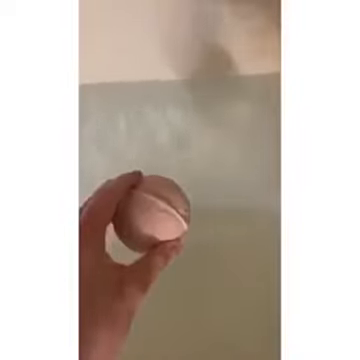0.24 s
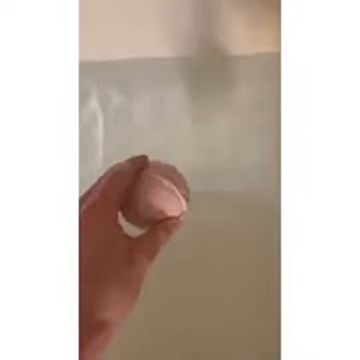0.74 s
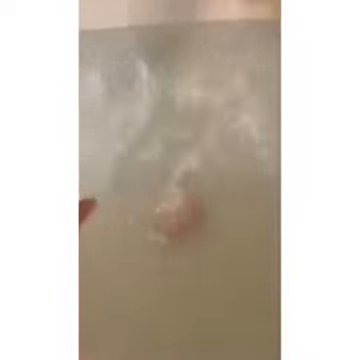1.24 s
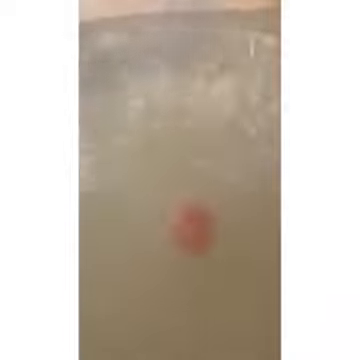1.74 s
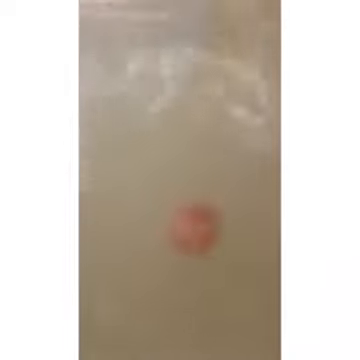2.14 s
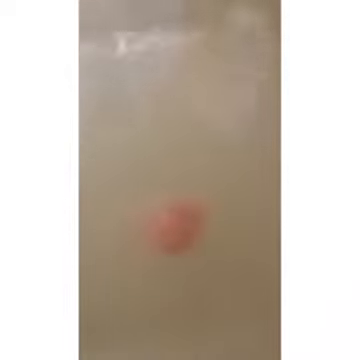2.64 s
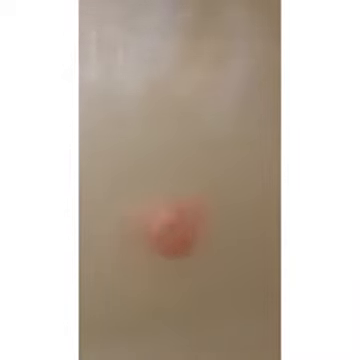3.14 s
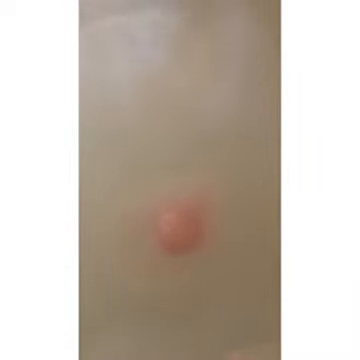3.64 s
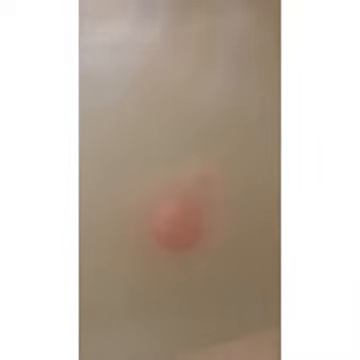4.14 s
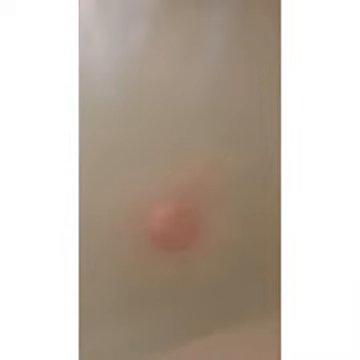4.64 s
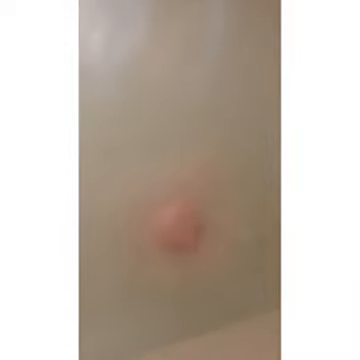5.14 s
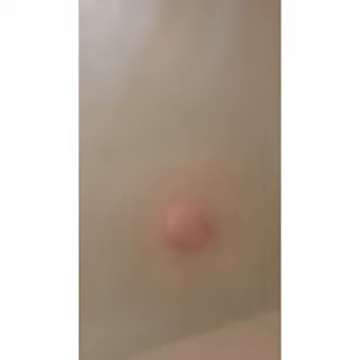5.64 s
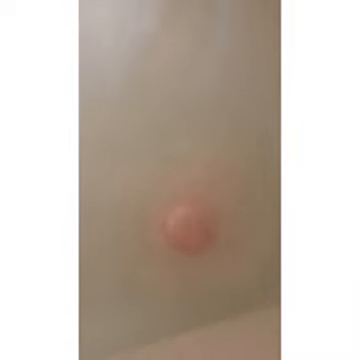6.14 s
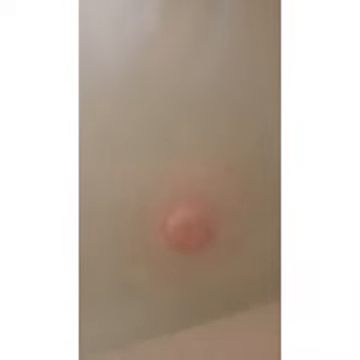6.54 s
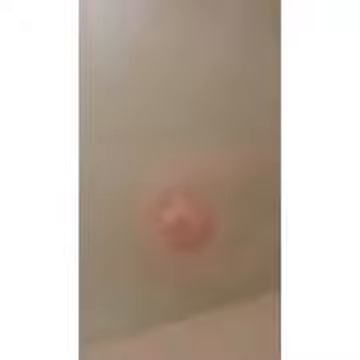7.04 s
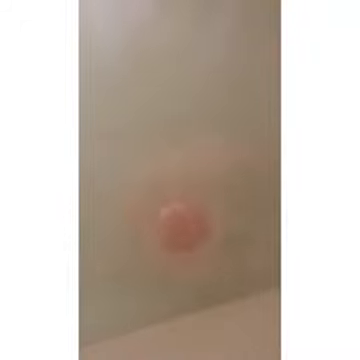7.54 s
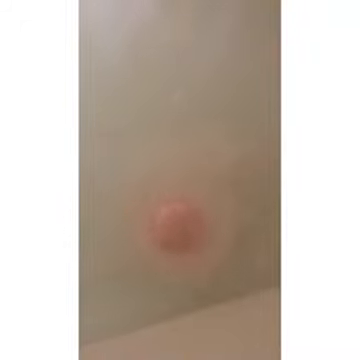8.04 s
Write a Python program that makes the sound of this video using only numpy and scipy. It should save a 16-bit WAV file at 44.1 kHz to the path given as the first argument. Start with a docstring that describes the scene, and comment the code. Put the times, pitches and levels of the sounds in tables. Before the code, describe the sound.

Close handheld stereo sound of a running whirlpool bath. A low, even motor drone lies under continuous foamy churning. A cluster of dull thumps on the tub comes first, followed by a short, bright plop as a ball drops in. Afterwards the water keeps fizzing and gurgling, slightly less bright, with small bubble bursts, occasional soft knocks and sharp droplet cracks near the end.

```python
"""Whirlpool jets churn a full bathtub: filtered noise and bubble swarms rumble, hiss and fizz.
Bubbles pop as short rings with spits of noise; knocks ring the modes of the tub shell.
A small ball drops in as damped sines, droplets crack on the tub wall, and the pump hums in sines.
A small tiled bathroom answers with decaying noise, heard close up by a handheld two-port microphone."""
import sys
import numpy as np
from scipy import signal
from scipy.fft import rfft, irfft, next_fast_len
from scipy.io import wavfile
from scipy.ndimage import uniform_filter1d, map_coordinates

SR = 44100
rng = np.random.default_rng(int(sys.argv[2]) if len(sys.argv) > 2 else 0)


def file_out(sig):
    """Save sig as 16-bit WAV at sys.argv[1]."""
    # one column per channel
    cols = np.atleast_2d(sig).T
    # limit, then scale
    lim = np.clip(cols, -1, 1)
    pcm = np.round(lim * 32767).astype(np.int16)
    wavfile.write(sys.argv[1], SR, pcm)


N = 365148
TOP_HZ = 15750  # band limit of the whole sound


def amp(db):
    """Gain of a level in dB."""
    return 10 ** (np.asarray(db) / 20)


def unit(x):
    """x at rms 1."""
    return x / np.sqrt(np.mean(x ** 2) + 1e-20)


def along(points, hz):
    """Read (frequency, value) points at hz, on a log frequency axis."""
    f, v = np.transpose(points)
    return np.interp(np.log(hz + 1), np.log(f + 1), v)


def curves(rows):
    """One value per sample for each column after the time."""
    s, *cols = np.transpose(rows)
    return [np.interp(np.arange(N) / SR, s, c) for c in cols]


def wobble(rate):
    """A smooth random curve, rate knots a second."""
    knots = rng.standard_normal(int(N * rate / SR) + 4)
    return map_coordinates(knots, [np.arange(N) * rate / SR])


def filtered(x, response):
    """x times a complex response of frequency."""
    m = next_fast_len(N + SR // 2)
    return irfft(rfft(x, m) * response(np.fft.rfftfreq(m, 1 / SR)), m)[..., :N]


def shaped(x, colour):
    """x through a colour filter, then set to rms 1."""
    return unit(filtered(x, colour))


def ringing(modes, hz):
    """Summed response of resonances, each with a centre, a width and a peak level."""
    return sum(amp(db) * 1j * hz * w / (c * c - hz * hz + 1j * hz * w) for c, w, db in modes)


def add_at(out, s, grain):
    """Mix a grain into out from time s."""
    out[round(s * SR):][:len(grain)] += grain


# decay of the tiled walls: (frequency [Hz], t60 [s])
TILE_DECAY = [(200, 0.56), (2000, 0.19), (12000, 0.097)]


def tiles(x):
    """Walls answer as decaying noise, duller bands lasting longer, at the level of the sound itself."""
    hz, t, z = signal.stft(rng.standard_normal(SR // 2), SR, nperseg=256)
    z = z * amp(-60 * t / along(TILE_DECAY, hz)[:, None])
    # every band of the tail gets the same energy
    tail = signal.istft(z / np.linalg.norm(z, axis=1, keepdims=True), SR, nperseg=256)[1]
    return signal.fftconvolve(x, tail / np.linalg.norm(tail))[:N]


def scattered(x):
    """Off the heaving water, the phases of the echoes never stay put."""
    z = signal.stft(x, nperseg=2048)[2]
    z = z * np.exp(2j * np.pi * rng.random(z.shape))
    # random phases cancel about half the power where frames overlap
    return np.sqrt(2) * signal.istft(z, nperseg=2048)[1][:N]


# colour of the water while the microphone is held high: (frequency [Hz], level [dB])
HIGH_COLOUR = [(1000, -1), (1500, -3), (1950, 4), (2170, -2), (2500, 4), (2800, -7.5), (3030, -4.5),
               (3320, 2), (3700, -0.5), (4100, -3), (4600, -2)]
# start and end of the move down: (time [s], time [s])
LOWERING = [2.03, 2.63]


def handheld(x):
    """The hand lowers the microphone: the coloured water crossfades to the plain water."""
    high = np.interp(np.arange(N) / SR, LOWERING, [1, 0])
    coloured = filtered(x, lambda hz: amp(along(HIGH_COLOUR, hz)))
    return (1 - high) * x + high * coloured


# likeness of the two ports: (frequency [Hz], left-right correlation [-1 to 1])
PORT_LIKENESS = [(90, 1), (300, .91), (480, .52), (850, .3), (1300, .72), (2000, .55), (3000, .75),
                 (3900, .7), (4500, .998), (15000, .998)]
# phase by which the left port leads: (frequency [Hz], phase [rad])
LEFT_LEAD = [(0, 0), (1450, .05), (2400, 2.2), (3300, 1.45), (4000, 2.2), (4700, 3.14), (6850, 6.28),
             (8950, 9.42), (15150, 18.85), (16000, 20.1)]
# left port over right port: (frequency [Hz], level [dB])
LEFT_OVER_RIGHT = [(90, 0), (300, 3.2), (600, .4), (900, -.3), (1400, 1.2), (2000, 0), (2900, .8),
                   (4000, .3), (6000, 0)]


def ports(near, diffuse):
    """Both ports share the near sound; the diffuse sound, phase and level set them apart."""
    def turn(hz):
        return np.arccos(np.clip(along(PORT_LIKENESS, hz), -1, 1)) / 2

    mid = filtered(near, lambda hz: np.cos(turn(hz)))
    side = filtered(diffuse, lambda hz: np.sin(turn(hz)))
    half = np.array([[.5], [-.5]])  # each port takes half of the difference

    def offset(hz):
        lead = np.interp(hz, *np.transpose(LEFT_LEAD))
        return amp(half * along(LEFT_OVER_RIGHT, hz)) * np.exp(1j * half * lead)

    return filtered(np.array([mid + side, mid - side]), offset)


# pump shaft: (time [s], frequency [Hz], rms level [dB])
PUMP_SHAFT = [(0, 45.05, -33.6), (4.5, 45.06, -33.6), (8.28, 45.18, -33.6)]
# shaft orders before their waver: (multiple of the shaft, level re the shaft tone [dB])
SHAFT_ORDERS = [(2, -12.5), (4, -17.5), (6, -10), (7, -14)]
# motor buzz before its waver: (frequency [Hz], rms level [dB])
MOTOR_BUZZ = [(120, -46)]


def pump():
    """The shaft tone is clean; its orders and the motor buzz waver in level and phase."""
    hz, db = curves(PUMP_SHAFT)
    turn, t = 2 * np.pi * np.cumsum(hz) / SR, np.arange(N) / SR

    def waver(level_db, phase):
        return amp(level_db + 2 * wobble(7)) * np.sin(phase + .8 * wobble(5))

    shaft = np.sin(turn) + sum(waver(level, k * turn) for k, level in SHAFT_ORDERS)
    buzz = sum(waver(level, 2 * np.pi * f * t) for f, level in MOTOR_BUZZ)
    return np.sqrt(2) * (amp(db) * shaft + buzz)


TICK_T60_S = 0.013
# droplets strike the tub wall: (time [s], peak level [dB], frequency [Hz])
DROPLET_TICKS = [(0.5457, -13, 9000), (0.6529, -13, 9000), (1.4137, -15, 7000), (3.2321, -14, 8000),
                 (3.3932, -19, 9000), (6.0994, -20, 9000), (.9722, -17, 1200), (7.2235, -17, 2500),
                 (7.4395, -13, 1800), (7.541, -8, 2700)]


def ticks():
    """Dry cracks a few milliseconds long: bright noise with a blip of pitch."""
    out, t = np.zeros(N + SR), np.arange(SR // 50) / SR
    for s, db, hz in DROPLET_TICKS:
        snap = unit(np.diff(uniform_filter1d(rng.standard_normal(len(t) + 1), size=3)))
        blip = np.sin(2 * np.pi * hz * t)
        crack = (0.8 * snap - blip) * amp(-60 * t / TICK_T60_S)
        add_at(out, s, amp(db) * crack / np.abs(crack).max())
    return out[:N]


# the ball breaks the surface, in damped sines:
# (time [s], level before damping [dB], frequency [Hz], decay constant [cycles])
BALL_SPLASH = [(.98, -16, 2000, 2.7), (.9885, -9, 4840, 3.5), (0.9938, 4, 5750, 1.9), (.9952, -5, 7440, 2),
               (0.9962, -6, 11000, 3), (.9965, -6, 14500, 3.5), (1.001, -12, 5800, 3.8),
               (1.011, -11, 6260, 3.5), (1.04, -13, 920, 1.2), (1.0545, -18, 2700, 6.5),
               (1.057, -18, 3300, 4.5), (1.059, -23, 2320, 4.5)]


def splash():
    """The ball gives a sharp slap and droplets, then the cavity closes, all in damped sines."""
    out, t = np.zeros(N + SR), np.arange(SR // 20) / SR
    for s, db, hz, cycles in BALL_SPLASH:
        age = hz * t / cycles
        envelope = np.exp(-age) * (1 - np.exp(-5 * age))
        add_at(out, s, amp(db) * np.sin(2 * np.pi * hz * t) * envelope)
    return out[:N]


# soft blows on the tub:
# (time [s], peak level [dB], centre [Hz], t60 before the puff's own decay [s], spread [octaves])
TUB_KNOCKS = [(.627, -23, 506, 0.069, 0.44), (0.6332, -10, 300, 0.06, 1.1), (.633, -21, 238, 0.41, 0.088),
              (0.6449, -13, 300, 0.045, 0.8), (.6575, -13, 260, .06, .8), (0.6657, -14, 250, 0.068, 0.75),
              (.68, -27, 90, 0.26, 0.61), (0.688, -27, 247, 0.1, 0.35), (.698, -25, 300, 0.067, 0.84),
              (0.7116, -18, 250, 0.065, 0.87), (0.7724, -22, 320, 0.039, 0.65), (.812, -25, 427, 0.1, 0.22),
              (0.837, -25, 400, 0.055, 0.4), (0.761, -24, 340, 0.26, 0.33), (.8, -26, 426, 0.19, 0.21),
              (1.031, -29, 105, 0.11, .4), (1.666, -28.5, 430, 0.39, 0.2), (1.94, -22.5, 436, 0.29, 0.24),
              (3.118, -22.5, 427, 0.19, 0.31), (3.696, -19, 440, 0.14, 0.28), (3.709, -22, 104, 0.45, 0.21),
              (4.6, -24, 500, 0.1, 0.88), (4.679, -24.5, 200, 0.44, 0.81), (6.159, -20.5, 300, 0.11, .54),
              (6.63, -24, 414, 0.21, 0.22), (7.14, -24, 430, 0.11, 0.37)]
# tub shell modes, also shaken by the jets: (frequency [Hz], width [Hz], relative level [dB])
SHELL_MODES = [(70.6, 15, -16), (108, 14, 2), (124, 15, -4.5), (180, 11, -3), (238.2, 14, 0.5),
               (265, 5.6, -4.5), (289.7, 13, 5), (345.4, 10.2, 3.5), (432, 22, 2), (465, 11, -3.5),
               (577, 44, -4)]


def knocks():
    """Each soft blow rings the tub shell around its centre pitch, over a dull puff."""
    out, t = np.zeros(N + SR), np.arange(SR // 2) / SR
    dull = signal.butter(N=2, Wn=700, fs=SR, output="sos")
    for s, db, hz, t60, octaves in TUB_KNOCKS:
        ring = np.zeros(len(t))
        for c, _, level in SHELL_MODES:
            reach_db = -6 * (np.log2(c / hz) / octaves) ** 2  # far modes answer less
            ring -= amp(level + reach_db + rng.normal(0, .7)) * np.sin(2 * np.pi * c * t)
        puff = 0.22 * unit(signal.sosfilt(dull, rng.standard_normal(len(t)))) * amp(-60 * t / 0.25)
        envelope = amp(-60 * t / max(t60, .01)) * (1 - np.exp(-t / .0015))
        push = (unit(ring) + puff) * envelope
        add_at(out, s, amp(db) * push / np.abs(push).max())
    return out[:N]


# mean air resonances above the water: (frequency [Hz], width [Hz], level re the direct sound [dB])
BASIN_AIR = [(732, 20, -4.5), (828, 23, 5), (1091, 16, -32), (1282, 15, 11), (1410, 21, 5.5),
             (1514, 16, 4.5), (1592, 29, 8.5), (1793, 16, 12.5), (2190, 24, 9), (2410, 46, 4),
             (2888, 82, 4), (3040, 77, 6.5), (3350, 68, 4.5), (3590, 60, 1.5)]
DRIFT_SHARE, SWELL_DB = 0.007, 2.0  # wander in pitch (share of the frequency) and strength


def basin(hz):
    """The hollow of the tub lifts a few narrow bands of the water's sound."""
    return 1 + ringing(BASIN_AIR, hz)


def hollow(x):
    """The basin's resonances wander slowly, each in its own way, as the surface heaves."""
    hz, t, z = signal.stft(x, SR, nperseg=2048)
    at = np.minimum(t * SR, N - 1).astype(int)
    modes = []
    for c, w, db in BASIN_AIR:
        pitch = c * (1 + DRIFT_SHARE * wobble(1.35)[at])
        modes.append((pitch, w, db + SWELL_DB * wobble(2.476)[at]))
    gain = np.abs(1 + ringing(modes, hz[:, None]))
    return signal.istft(z * gain, SR, nperseg=2048)[1][:N]


# larger bubbles, before envelopes and colour:
# (time [s], level of each ring [dB], bubble pitch [Hz], noise spit level [dB])
BUBBLE_POPS = [(0.069, -28, 2460, -21), (.3554, -29, 3280, -29), (0.487, -29, 3270, -34),
               (.5232, -26, 3340, -29), (.5457, -34, 3280, -30), (0.587, -26, 6840, -30),
               (.634, -24, 2210, -30), (.664, -28, 1740, -38), (0.757, -34, 1820, -38),
               (.957, -21, 2760, -34), (1.413, -40, 6010, -17), (1.5817, -19, 11400, -30),
               (1.962, -28, 6500, -16.5), (2.143, -30, 6750, -25), (3.078, -30, 1496, -38),
               (3.1193, -28, 2980, -21), (3.197, -27.5, 2230, -34), (3.233, -35, 3020, -21),
               (3.3196, -33, 3040, -28), (3.615, -35, 3500, -24), (3.699, -26, 3360, -24),
               (3.941, -27, 3070, -23), (4.3777, -29, 2950, -35), (4.902, -26, 2930, -31),
               (5.342, -33, 2770, -28), (5.5044, -26, 2280, -29), (5.9306, -37, 3280, -40),
               (6.2513, -27, 2840, -43), (6.505, -20, 6600, -27), (7.243, -26.5, 3040, -27),
               (7.316, -31, 2480, -37), (7.438, -36, 2130, -24), (7.5403, -41, 2500, -30),
               (7.756, -33, 2600, -32), (7.8153, -24, 2390, -28), (7.941, -28, 2820, -26),
               (8.075, -25.5, 3270, -23)]


def pops():
    """Larger bubbles burst in threes: short rings near one pitch and a spit of bright noise."""
    rings, spits, t = np.zeros(N + SR), np.zeros(N + SR), np.arange(SR // 20) / SR
    for s, db, hz, spit_db in BUBBLE_POPS:
        age = hz * t / 12
        spreads = np.exp(rng.normal(0, .07, size=3))
        cluster = sum(np.sin(2 * np.pi * hz * spread * t) for spread in spreads)
        add_at(rings, s, amp(db) * cluster * np.exp(-age) * (1 - np.exp(-6 * age)))
        spit_gain = amp(spit_db - 60 * t / 0.099) * (1 - np.exp(-t / 0.0014))
        add_at(spits, s, spit_gain * rng.standard_normal(len(t)))
    spit_colour = [(1500, -33), (4000, 2.5), (15000, -6.0)]  # (frequency [Hz], level [dB])
    bright = filtered(spits[:N], lambda hz: amp(along(spit_colour, hz)))
    return filtered(rings[:N], basin) + bright


def patchy(depth_db):
    """White noise with patches of random gain in time and frequency."""
    z = signal.stft(rng.standard_normal(N), nperseg=512)[2]
    field = uniform_filter1d(rng.standard_normal(z.shape), size=6, axis=0)
    field = uniform_filter1d(field, size=8, axis=1)
    return unit(signal.istft(z * amp(depth_db * unit(field)), nperseg=512)[1][:N])


def bubbles(count, centre_hz, spread, cycles, scatter_db, size):
    """A swarm of damped sines that rise in pitch as they near the surface."""
    draw, t = rng.random((count, 2)), np.arange(size) / SR
    hz = np.clip(centre_hz * np.exp(spread * rng.standard_normal((count, 1))), 100, TOP_HZ)
    age = hz * t / cycles
    gain = amp(scatter_db * np.minimum(-np.log(1 - draw[:, 1:]), 4))  # a few are much louder
    rising = np.sin(2 * np.pi * hz * t * (1 + 0.028 * age))
    grain = gain * rising * np.exp(-age) * (1 - np.exp(-8 * age))
    at = (draw[:, :1] * N).astype(int) + np.arange(size)
    return unit(np.bincount(at.ravel(), grain.ravel(), N + size)[:N])


SPATTER_PER_S, SPATTER_S = 12, 0.01  # mean rate, decay time constant [s]


def spatter():
    """Sudden lifts of random size that die away, rms 1."""
    draw, t = rng.random((round(SPATTER_PER_S * N / SR), 2)), np.arange(SR // 5) / SR
    starts = np.bincount((draw[:, 0] * N).astype(int), draw[:, 1], N)
    envelope = np.exp(-t / SPATTER_S) * (1 - np.exp(-t / 0.0043))
    lifts = signal.fftconvolve(starts, envelope)[:N]
    return unit(lifts - lifts.mean())


# slow level of each layer of the water, before surges and flutter:
# (time [s], gurgle [dB], churn [dB], spray [dB], mist [dB], rumble [dB])
WATER_FLOW = [(0.0, -32.5, -30, -32.5, -36.5, -31.5), (0.32, -34.5, -36.5, -31.5, -37.5, -31.5),
              (1.61, -35, -35.5, -31.5, -37, -31), (1.8, -32, -35.5, -31, -37, -32),
              (2.1, -31.5, -35.5, -34, -38.5, -30), (2.3, -34, -34, -32.5, -37, -32.5),
              (2.44, -37, -36, -34, -42, -32.5), (2.67, -37, -34, -31.5, -39.5, -34),
              (2.92, -33.5, -34, -34.5, -39, -33.5), (3.05, -32, -35.5, -36, -41.5, -33.5),
              (3.3, -34.5, -36, -37, -40, -33), (3.53, -37.5, -36.5, -33.5, -42, -34),
              (3.87, -33, -35, -38.5, -41.5, -32), (4.13, -36.5, -33.5, -34, -40, -33),
              (5.56, -37, -35, -36, -41.5, -32.5), (5.95, -38, -36.5, -33.5, -44, -31.5),
              (6.37, -36, -35, -36.5, -41, -32), (6.87, -39, -35, -36, -44, -30.5),
              (7.29, -37, -35, -37, -41.5, -31), (7.59, -39, -34, -34, -41, -33.5),
              (8.28, -35.5, -34.5, -34, -40.5, -32)]
# a jet breaks the surface for a moment:
# (middle [s], lift at the centre [dB], centre [Hz], length at half the lift [s])
JET_SURGES = [(0.288, 7, 1300, 0.085), (0.466, 6.5, 1900, 0.058), (0.694, 5, 2200, 0.11),
              (.975, 4.5, 9000, 0.034), (0.996, 9, 9000, 0.012), (1.015, 4, 6500, 0.04),
              (1.067, 7, 2300, 0.047), (1.22, 6, 1700, 0.08), (1.454, 3.5, 10000, 0.043),
              (1.592, 3.5, 10000, 0.051), (1.7, 4.5, 5000, 0.031), (1.987, 4, 8000, 0.041),
              (2.055, 5, 6000, 0.045), (2.161, 9.5, 4970, 0.031), (2.245, 5, 2000, 0.062),
              (2.36, 4, 11000, 0.024), (2.72, 3, 4000, 0.065), (3.115, 3, 1200, 0.056),
              (3.154, 4, 3500, 0.046), (3.22, 5, 8000, 0.21), (3.628, 10.5, 2500, 0.032),
              (3.727, 5.5, 8000, 0.049), (3.927, 7, 7000, 0.16), (4.322, 6, 8000, 0.025),
              (4.386, 0.5, 3000, 0.026), (4.61, 3.5, 1500, 0.087), (4.907, 2.5, 3000, 0.21),
              (5.363, 5.5, 4000, 0.075), (5.54, 3, 2800, 0.043), (5.98, -1, 6500, 0.026),
              (6.105, 4, 10500, 0.028), (6.177, 6.5, 8000, 0.026), (6.266, 3, 3000, 0.11),
              (6.533, 6, 8000, 0.067), (6.577, 7.5, 1200, 0.036), (6.644, 8.5, 2800, 0.042),
              (7.054, 10.5, 1200, 0.031), (7.14, 8, 2200, 0.043), (7.22, 6.5, 7500, 0.09),
              (7.46, 4, 1300, 0.11), (7.554, 6, 4000, 0.016), (7.84, 4, 2300, 0.03),
              (7.935, 3, 6500, 0.039), (8.065, 4.5, 6000, 0.044)]
SURGE_REACH_OCT = 1.26  # distance from the centre where the lift has shrunk to 1/e
# where each surface layer sits: one row of gurgle, churn, spray, mist [Hz]
SURFACE_HZ = [1200, 2900, 6500, 11000]
# rms depth of the spatter all layers share: one row of gurgle, churn, spray, mist [dB]
SPATTER_DEPTH = [0.55, 1.85, 1.02, 1.56]
# scale of each layer's own flutter: one row of gurgle, churn, spray, mist [dB]
FLUTTER_DEPTH = [0.17, 0.11, 0.36, 0.98]


def heaving():
    """Level in dB of the four surface layers: slow flow, surges, shared spatter and own flutter."""
    t, shared = np.arange(N) / SR, spatter()
    levels = np.array(curves(WATER_FLOW)[:4])
    for s, lift_db, hz, length in JET_SURGES:
        near = slice(max(round((s - 2 * length) * SR), 0), round((s + 2 * length) * SR))
        swell = np.exp(-4 * np.log(2) * ((t[near] - s) / length) ** 2)
        reach = np.exp(-(np.log2(np.array(SURFACE_HZ) / hz) / SURGE_REACH_OCT) ** 2)
        levels[:, near] += lift_db * reach[:, None] * swell
    depths = zip(levels, SPATTER_DEPTH, FLUTTER_DEPTH)
    return [db + a * shared + b * wobble(15) for db, a, b in depths]


# colour of the rumble before the shell rings: (frequency [Hz], relative level per Hz [dB])
RUMBLE_COLOUR = [(30, -13), (60, -7.5), (100, -5), (150, -7), (280, -6.5), (400, -6), (560, -5),
                 (660, -16.5), (800, -9), (1100, -21.5)]
# colour filter of the gurgle: (frequency [Hz], relative level per Hz [dB])
GURGLE_COLOUR = [(450, -16), (700, 2.5), (1050, 3), (1280, 0.5), (1500, 2.5), (1700, -3), (1900, -14.5),
                 (2200, -8.5), (3000, -47)]
# colour filter of the churn: (frequency [Hz], relative level per Hz [dB])
CHURN_COLOUR = [(1300, -35), (1800, -7), (1950, -3), (2150, -2.5), (2350, -4), (2600, 1.5), (3100, -1),
                (3600, -2.5), (4000, -7), (4600, -20), (6000, -50)]
# colour filter of the spray: (frequency [Hz], relative level per Hz [dB])
SPRAY_COLOUR = [(2500, -30), (3950, -5), (4400, 1.5), (4900, -.5), (6300, -1.5), (7500, -5.5), (8100, -2.5),
                (9000, -5), (10000, -12), (12000, -30)]
# colour filter of the mist: (frequency [Hz], relative level per Hz [dB])
MIST_COLOUR = [(6000, -30), (8500, -7), (10000, 0), (12000, -3), (14000, -8), (15800, -11.5)]


def jets():
    """Turbulence shakes the shell; the broken surface gurgles, churns, sprays and mists."""
    def shell_rumble(hz):
        return amp(along(RUMBLE_COLOUR, hz)) * (1 + amp(3.0) * ringing(SHELL_MODES, hz))

    rumble = shaped(patchy(1.2), shell_rumble)
    swarm = bubbles(count=5000, centre_hz=2403, spread=0.4026, cycles=4.97, scatter_db=3.5, size=600)
    froth = unit(hollow(patchy(1.6))) + 0.34 * swarm
    gurgle = shaped(froth, lambda hz: amp(along(GURGLE_COLOUR, hz)))
    churn = shaped(froth, lambda hz: amp(along(CHURN_COLOUR, hz)))
    fizz = bubbles(count=12000, centre_hz=7730, spread=0.56, cycles=5.1, scatter_db=4.0, size=120)
    spray = shaped(patchy(3.0) + 0.21 * fizz, lambda hz: amp(along(SPRAY_COLOUR, hz)))
    mist = shaped(patchy(2.4) + .45 * fizz, lambda hz: amp(along(MIST_COLOUR, hz)))
    surface = sum(amp(db) * layer for db, layer in zip(heaving(), [gurgle, churn, spray, mist]))
    rumble_db = curves(WATER_FLOW)[-1]
    return amp(rumble_db) * rumble + surface


def scene():
    """Water, knocks, splash and ticks in the bathroom, over the pump."""
    water = handheld(jets() + pops()) + knocks() + splash() + ticks()
    walls = tiles(water)
    echo_colour = [(300, -28), (1000, -10), (4000, -11), (8000, -23)]  # (frequency [Hz], level [dB])
    echo = filtered(scattered(walls), lambda hz: amp(along(echo_colour, hz)))
    return ports(water + echo + pump(), scattered(walls))


def record(dry):
    """Nothing is kept above the band limit."""
    return filtered(dry, lambda hz: hz < TOP_HZ)


dry = scene()
out = record(dry)
file_out(out)
```